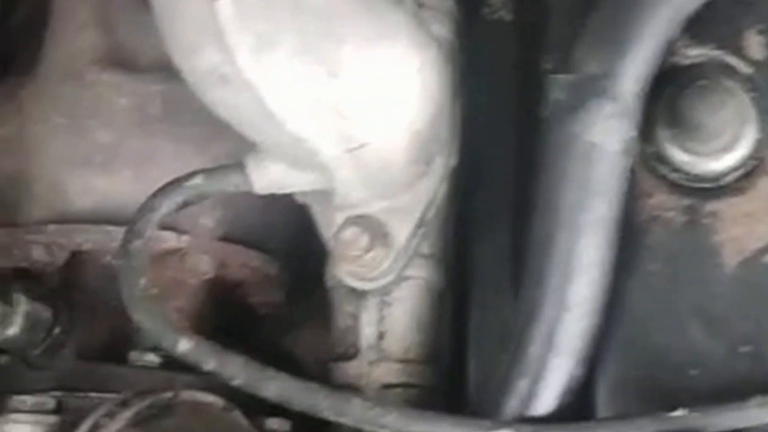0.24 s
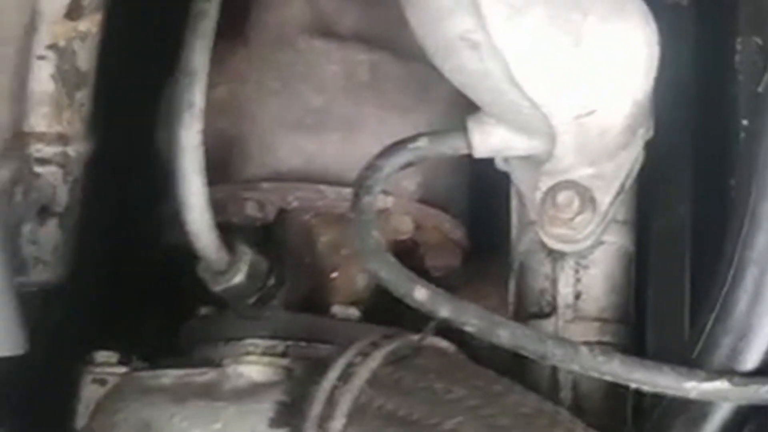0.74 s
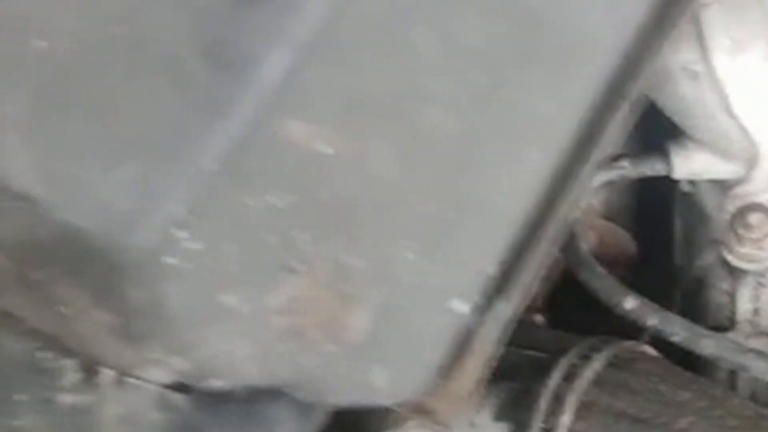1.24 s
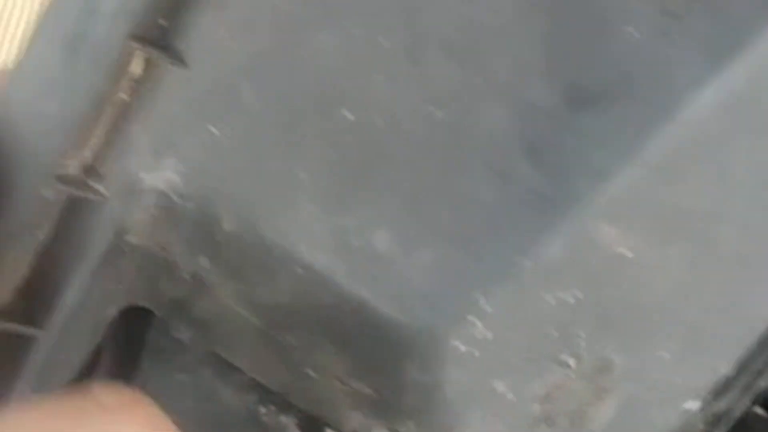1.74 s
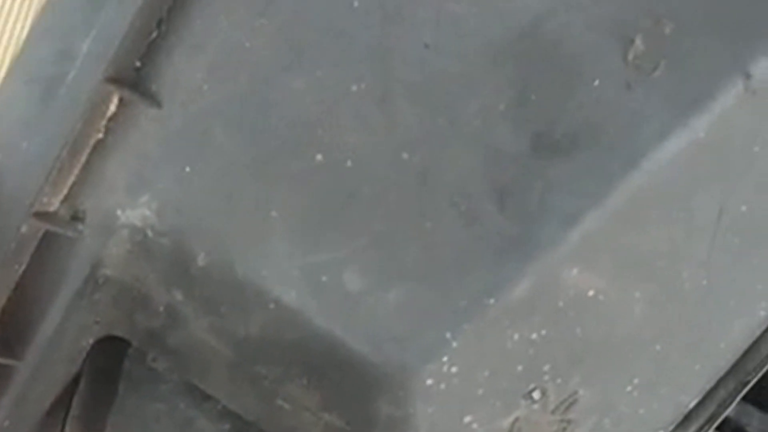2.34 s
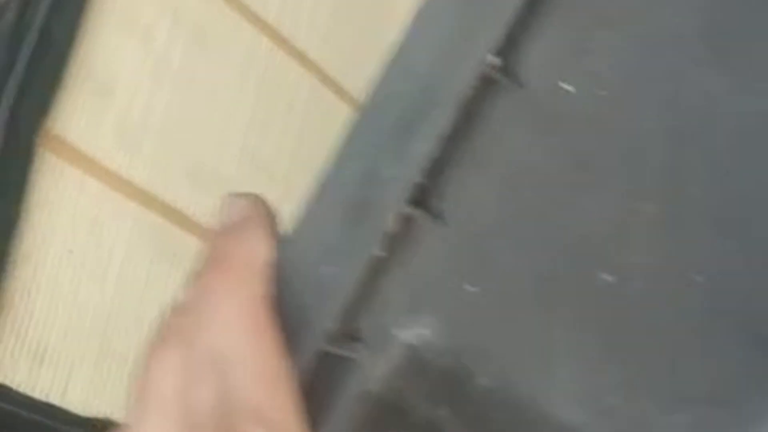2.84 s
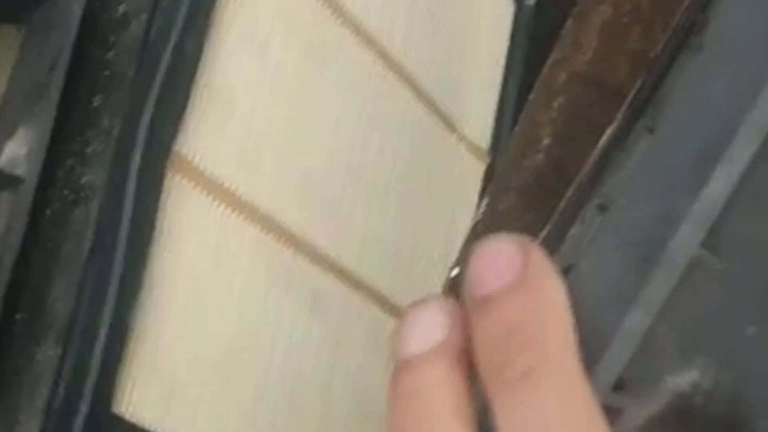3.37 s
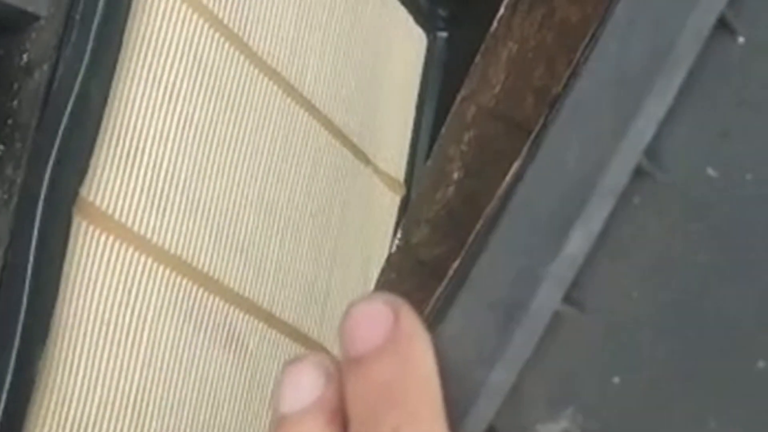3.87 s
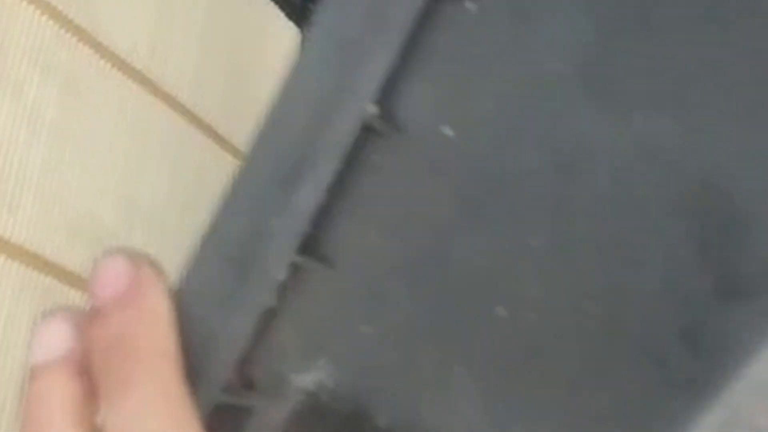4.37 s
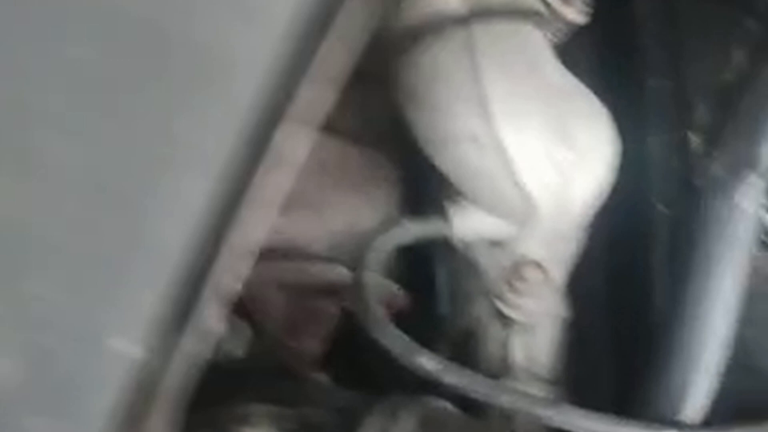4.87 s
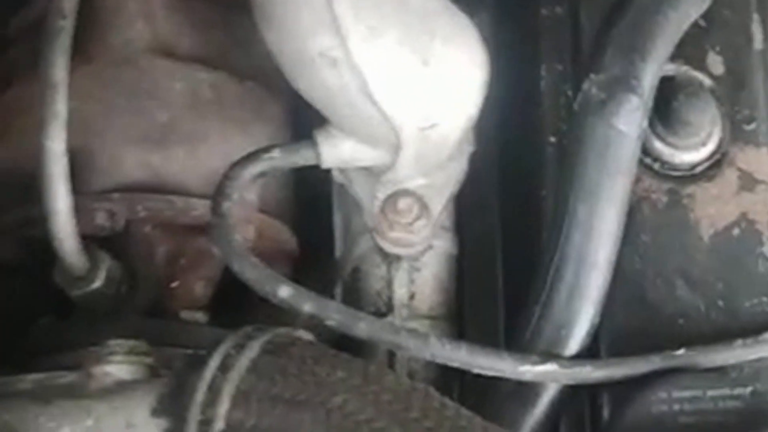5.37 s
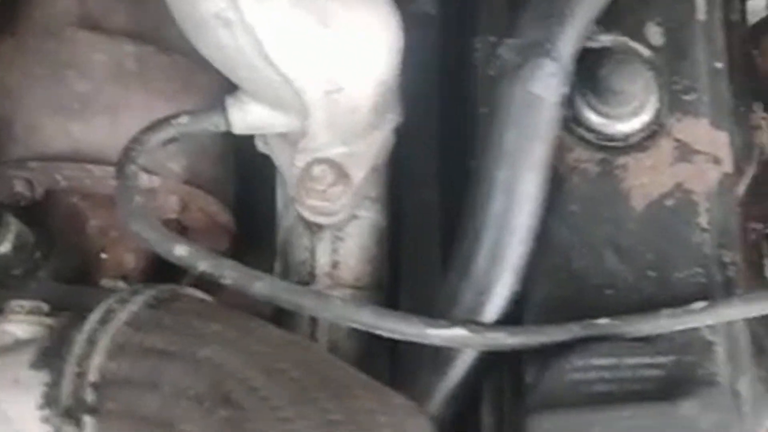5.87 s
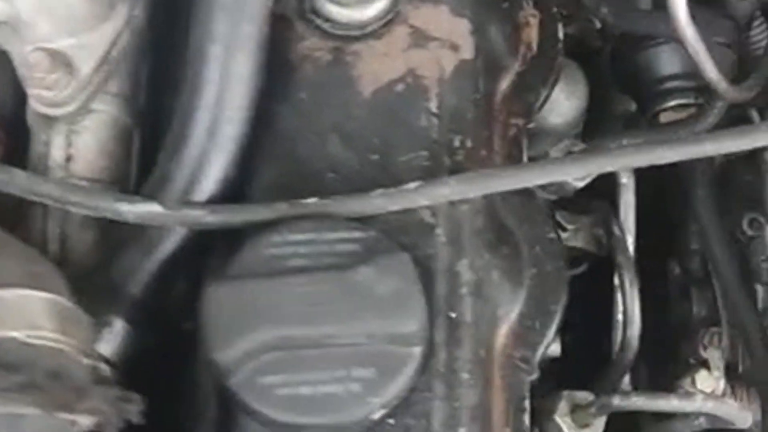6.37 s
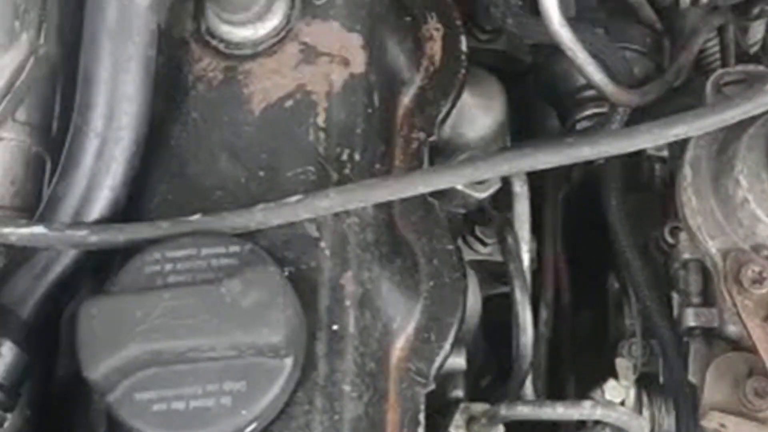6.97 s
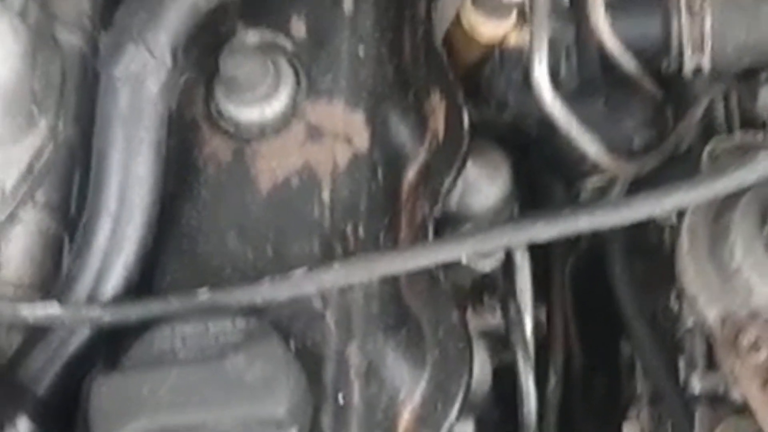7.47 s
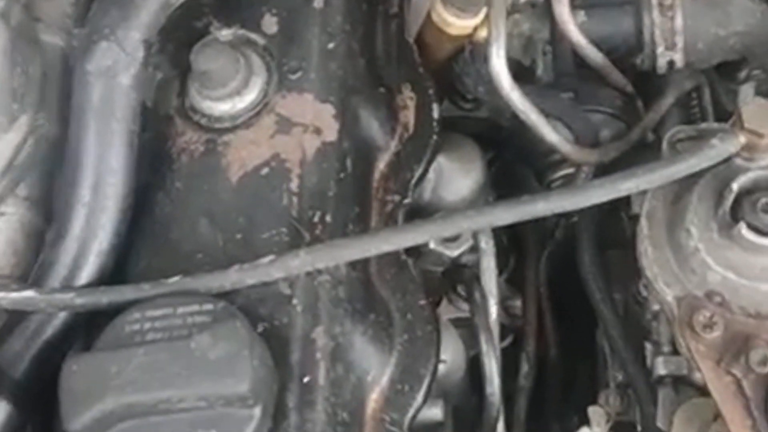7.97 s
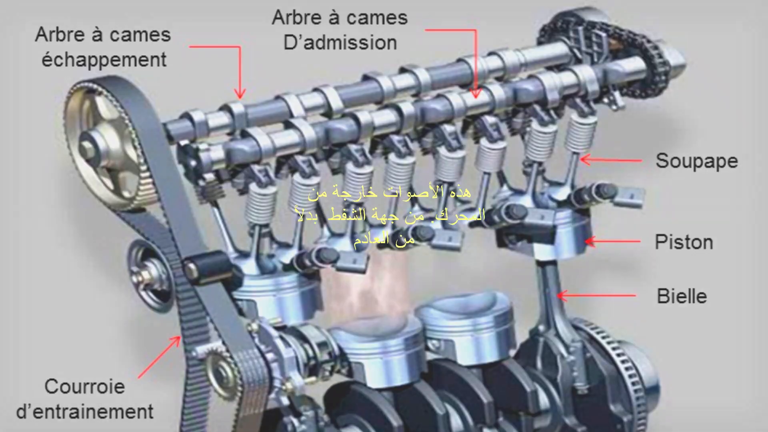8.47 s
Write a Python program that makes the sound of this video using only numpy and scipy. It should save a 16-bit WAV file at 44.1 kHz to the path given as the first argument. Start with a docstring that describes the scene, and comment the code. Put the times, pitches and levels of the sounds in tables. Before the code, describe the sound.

A four-cylinder diesel idles from 0 s, very close, at nearly 900 revolutions per minute with only a tiny drift. About thirty low intake thumps come each second; every fourth is much harder, giving a lopsided chug roughly seven times a second, with a short hollow bark falling in pitch. Over it runs dense, grainy metallic clatter in uneven bursts, ringing through the block, with bright fizz on top. The microphone leaves the valve cover around 0.7 s for the manifold, where a throbbing mid-pitched duct hum, leaning left, emerges. Around 2.9 s it reaches the open air box: clatter slightly softer and boxier, bark and hum stronger. Around 4.7 s it returns to the manifold, harder and louder clatter. From about 6 s, over the valve cover, hum fades almost away and rattle is close and crisp. At 8.2 s everything cuts abruptly to silence.

```python
"""Idling four-cylinder diesel, close up

A hand holds the air-filter lid open in the engine bay. Each cylinder gulps air with a low thump, one far
harder than the rest; the thumps ring the air box and its mouth, and one engine harmonic hums in the duct.
Bursts of shaped noise, coloured by block resonances, make the metallic clatter; slow cosines rock the engine.
The microphone moves between manifold, open air box and valve cover; the sound is cut off near the end."""
import sys
import numpy as np
from scipy import signal
from scipy.fft import rfft, irfft
from scipy.io import wavfile

SR = 44100
rng = np.random.default_rng(int(sys.argv[2]) if len(sys.argv) > 2 else 0)


def generate_wav(signal):
    """Clip the signal to [-1, 1] and save it as 16-bit WAV at the path in sys.argv[1]."""
    frames = np.transpose(np.atleast_2d(signal))
    scaled = np.clip(frames, -1, 1) * 32767
    pcm = np.round(scaled).astype(np.int16)
    wavfile.write(sys.argv[1], SR, pcm)


N = 384542
TIME = np.arange(N) / SR


def amp(db):
    """Decibels to gain."""
    return 10 ** (np.asarray(db) / 20)


def evened(x):
    """Scales to an rms of one."""
    return x / np.sqrt(np.mean(x ** 2) + 1e-20)


def read(points, hz):
    """Reads a spectrum on a log-frequency axis."""
    f, value = np.transpose(points)
    return np.interp(np.log(hz + 1), np.log(f), value)


def ports(balance_db):
    """Left and right gains for a level difference, left minus right."""
    half_db = np.atleast_1d(balance_db) / 2
    return amp(np.array([half_db, -half_db]))


def waver(rate_hz):
    """Random drift of unit rms, mostly slower than the given rate."""
    hz = np.fft.rfftfreq(N, 1 / SR)
    return evened(irfft(rfft(rng.standard_normal(N)) * np.exp(-(hz / rate_hz) ** 2), N))


PLACES, FIRST_PLACE = ("manifold", "air box", "valve cover"), "valve cover"
# Microphone moves. Each row: halfway in seconds, time taken in seconds, goal.
MOVES = [(.68, .9, "manifold"), (2.85, 1.0, "air box"), (4.7, 0.97, "manifold"),
         (6.02, 0.85, "valve cover")]
# Share of each place heard wherever the microphone is, in PLACES order, 0-1.
SPILL = (0.028, 0.036, 0.1)


def places():
    """Shares of the three listening places over time; each move is a smooth glide."""
    names = np.array(PLACES)[:, None]
    shares = (names == FIRST_PLACE) * np.ones(N)
    for halfway_s, taken_s, goal in MOVES:
        glide = .5 + .5 * np.sin(np.pi * np.clip((TIME - halfway_s) / taken_s, -.5, .5))
        shares = shares + glide * ((names == goal) - shares)
    spill = np.clip(SPILL, 0, 1)[:, None]
    return spill + max(1 - spill.sum(), 0) * shares


IDLE_RPM, FIRST_GULP_S = 887.3, .1017  # first hard gulp, before hunting shifts it
HUNT_S, HUNT_PERIOD_S, HUNT_LATE_S = 0.00082, 2.826, 1.0  # peak delay, period, time of a peak delay


def crank():
    """Engine cycles of two revolutions since the first hard gulp; the governor hunts gently."""
    behind_s = HUNT_S * np.cos(2 * np.pi * (TIME - HUNT_LATE_S) / HUNT_PERIOD_S)
    return (TIME - FIRST_GULP_S - behind_s) * IDLE_RPM / 120


def strokes(turns, place, spread_db, jitter_s, count=62):
    """One impulse each cycle at the given place, a little uneven in size and time."""
    size, slip = rng.standard_normal((count, 2)).T
    at_s = np.interp(np.arange(count) - 1 + place, turns, TIME, left=-1, right=-1)
    at = np.round((at_s + jitter_s * slip) * SR).astype(int)
    inside = (at >= 0) & (at < N)
    train = np.zeros(N)
    train[at[inside]] = amp(spread_db * size[inside])
    return train


# Rocking of the whole engine. Each row: multiple of the firing rate, rms in dB before place and side gains.
ROCKING = [(1, -32.5), (2, -54.5)]


def rocking(turns, place_db=(0, 1.2, -.8), side_db=.9):
    """The engine shakes on its mounts at multiples of the firing rate, four firings a cycle."""
    firing_rad = 8 * np.pi * turns
    shake = sum(-np.sqrt(2) * amp(db) * np.cos(round(k) * firing_rad) for k, db in ROCKING)
    return ports(side_db) * (amp(place_db) @ places()) * shake


HUM_ORDER = 46  # multiple of the cycle rate
# Duct hum before throb, waver and side gains: rms in dB at the manifold, at the air box, at the valve cover.
HUM_DB = (-37.5, -35.5, -65)


def hum(turns, side_db=7, waver_db=1.0, slip_rad=0.29, throb_db=7, low_place=.22, fall=0.15):
    """One engine harmonic sings in the duct; it builds through each cycle, collapses after the hard gulp."""
    tone = np.sqrt(2) * np.sin(2 * np.pi * HUM_ORDER * turns + slip_rad * waver(11))
    build = np.interp((turns - low_place) % 1, [0, 1 - fall, 1], [-.5, .5, -.5])
    throb = amp(throb_db * build + waver_db * waver(26))
    return ports(side_db) * (amp(HUM_DB) @ places()) * throb * tone


# Clatter bursts in each cycle. Each row: place 0-1, rise in seconds, decay constant in seconds, relative
# level on the block in dB, relative level of the treble in dB, gain at the air box and loss at the valve
# cover in dB.
KNOCKS = [(0.054, 0.0074, 0.014, -2, 0, 0), (.312, 0.0059, 0.024, -0.5, -1.95, 0),
          (0.554, 0.01, 0.068, -2, -4, 0.95), (0.747, 0.0059, 0.014, -9.5, 1.5, 2.6),
          (0.799, 0.011, 0.0052, 4.5, 1.5, 1.6)]


def blow_strength(turns, bed_db=-6.0, fizz_bed_db=-8.0, bed_shade_db=-0.5):
    """Rattle strength on the block and in the treble: a burst at each knock over a running bed."""
    t = TIME[:SR // 7]
    _, box, cover = places()
    power = (amp([[bed_db], [fizz_bed_db]]) * amp(bed_shade_db * box)) ** 2
    for place, rise_s, decay_s, block_db, treble_db, boxward_db in KNOCKS:
        shape = np.minimum(t / rise_s, 1) * np.exp(-np.maximum(t - rise_s, 0) / decay_s)
        train = strokes(turns, place, spread_db=0.8, jitter_s=0.00064)
        burst = signal.oaconvolve(train, shape)[:N]
        level = amp([[block_db], [treble_db]]) * amp(boxward_db * (box - cover))
        power = power + (level * burst) ** 2
    return np.sqrt(power / power.mean(1, keepdims=True))


def impacts(per_s=400, spread_db=2.5, decay_s=.001, share=.16, flutter_db=0.84):
    """Tiny metal contacts of random size and time, each a brief decay, make the rattle grainy."""
    sizes = amp(spread_db * np.minimum(rng.exponential(1, N), 4))
    hits = sizes * (rng.random(N) < per_s / SR)
    power = signal.lfilter([1], [1, -np.exp(-2 / (decay_s * SR))], hits ** 2)
    grain = np.sqrt(1 - share + share * power / power.mean())
    return grain * amp(flutter_db * waver(90))


def bay(hz, echo_db=-4.5, reach_s=.009, small_hz=1800, count=24):
    """Response of direct sound plus short echoes off nearby pipes and panels, too small to return bass."""
    delay, sign = rng.random((2, count)), rng.choice([-1., 1.], (2, count))
    taps = np.zeros((2, N))
    at = (SR * (.0007 + reach_s * delay)).astype(int)
    np.put_along_axis(taps, at, sign / np.sqrt(count), 1)
    echo = amp(echo_db) * hz ** 2 / (hz ** 2 + small_hz ** 2)
    return (1 + echo * rfft(taps)) / np.sqrt(1 + echo ** 2)


# Ringing of the block and its covers. Each row: frequency in Hz, width in Hz, level against the broad
# clatter in dB at the manifold, at the air box, at the valve cover.
BLOCK = [(458, 27, 3, 4.5, 3), (725, 28, 1, 3.5, 2.5), (726, 20, 13.5, -23, -29), (729, 49, -9, 8, 5.5),
         (980, 91, 0.5, 0.5, 4.5), (1051, 46, 5, 11, -6.5), (1170, 84, -16.5, 3.5, 0),
         (1836, 270, 4.5, 0, 4), (2160, 340, -14.5, 3, 5.5), (2252, 250, 9, -1.5, -2.5),
         (2763, 55, 8.5, 6, 7.5), (2915, 55, 7.5, -2, 6), (3280, 300, 3.5, 4, 5), (4650, 180, -0.5, 2, 2),
         (7800, 260, -0.5, 3, 2)]
# Broad colour of the clatter. Each row: frequency in Hz, relative spectral density in dB.
CLATTER = [(42, -4), (100, -1), (220, 1), (350, -4), (600, -2.5), (850, -3.5), (1250, -0.5), (1800, -2),
           (3000, -3.5), (4000, -0.24), (4900, -1.7), (8200, 2.5), (10000, 1.05), (12400, -10.5),
           (14200, -9)]
# Balance of the two microphone ports. Each row: frequency in Hz, left minus right in dB.
BALANCE = [(100, 0), (380, 4), (650, -0.5), (1200, 1), (3000, 1.5), (4600, 0), (6200, -3.5), (7800, -7.5),
           (9000, 0), (10200, 8.5), (12500, -1.5), (14400, 3.5)]
# Likeness of the two ports. Each row: frequency in Hz, correlation before the echoes.
LIKENESS = [(100, 0.77), (290, 0.52), (630, 0.11), (1100, 0.18), (2500, 0.062), (14000, 0.022)]
# Lid's colouring of the block at the air box. Each row: frequency in Hz, gain in dB.
SHADE = [(300, 1), (650, 4), (950, -2.5), (1500, -1), (2200, 4), (3200, 1.5), (5000, 1), (8000, 0),
         (13000, -1.5)]
# Colouring close over the valve cover. Each row: frequency in Hz, gain in dB.
CLOSE = [(300, 4.5), (600, 2), (1300, 0.5), (2500, 4), (5000, 1.14), (9000, 3), (13000, 2.5)]
# Clatter gain in dB at the manifold, at the air box, at the valve cover.
CLATTER_DB = (-17, -20.5, -18.5)
PORT_LAG_S = .00038


def clatter(turns, split_hz=5200):
    """Grainy noise bursts sound through the block's resonances, coloured by the microphone's place."""
    hz = np.fft.rfftfreq(N, 1 / SR)
    # heavy and light parts rattle on their own
    strength = blow_strength(turns) * np.array([impacts(), impacts()])
    block, treble = rfft(strength[:, None] * rng.standard_normal((2, 2, N)))
    low_share = 1 / (1 + (hz / split_hz) ** 4)
    left, other = np.sqrt(low_share) * block + np.sqrt(1 - low_share) * treble
    same = np.clip(read(LIKENESS, hz), -1, 1)
    sides = ports(read(BALANCE, hz))
    pair = np.array([left, same * left + np.sqrt(1 - same ** 2) * other])
    pair = pair * sides / np.sqrt((sides ** 2).mean(0))
    pair = pair * evened(amp(read(CLATTER, hz)))
    tilts_db = (0, read(SHADE, hz), read(CLOSE, hz))
    lags_s = (PORT_LAG_S, PORT_LAG_S, 0)
    out = np.zeros((2, N))
    for k, share in enumerate(places()):
        body = 1 + sum((amp(db[k]) - 1) / (1 + 2j * (hz - f) / width) for f, width, *db in BLOCK)
        arrival = np.exp(-2j * np.pi * np.outer([lags_s[k], 0], hz))  # left port hears it later
        out += share * irfft(pair * body * amp(tilts_db[k]) * arrival * bay(hz), N)
    return (amp(CLATTER_DB) @ places()) * out


def ring(train, modes, glide=0., settle_s=.004, swell_s=.0001):
    """Impulses set decaying modes ringing, which may start sharp and settle; levels vary by place."""
    t, shares, out = TIME[:SR // 2], places(), np.zeros((2, N))
    bent_s = t + glide * settle_s * (1 - np.exp(-t / settle_s))
    for hz, t60_s, *place_db, side_db in modes:
        envelope = (1 - np.exp(-t / swell_s)) * amp(-60 * t / t60_s)
        response = envelope * np.sin(2 * np.pi * hz * bent_s)
        out += ports(side_db) * (amp(place_db) @ shares) * signal.oaconvolve(train, response)[:N]
    return out


# One intake gulp a cylinder. Each row: place in the two-revolution cycle 0-1, relative level in dB,
# half width in seconds, lean of the pulse.
GULPS = [(0.0, -4, 0.0016, 0.029), (0.242, -15, 0.0012, 0.18), (0.473, -13.5, 0.0015, 0.11),
         (0.734, -11, 0.0016, 0.11)]
GULP_SPREAD_DB = .5
# Air-box modes. Each row: frequency in Hz, t60 in seconds, relative level in dB at the manifold, at the
# air box, at the valve cover, left minus right in dB.
AIRBOX = [(151.5, 0.16, -17, -17.5, -20.5, 0.5), (226.4, 0.14, -16.5, -19, -15, -1.5),
          (266.7, .08, -18.5, -17, -13.5, 12.5), (307, 0.062, -46.5, -47.5, -24.5, 1.5)]
# Bark of the air-box mouth after a hard gulp. Each row: settled frequency in Hz, t60 in seconds, relative
# level in dB at the manifold, at the air box, at the valve cover, left minus right in dB.
MOUTH = [(535, 0.04, -4.5, 0, -10, -4), (640, 0.14, -28.5, -32, -13, -3)]


def intake(turns, thump_db=(0, .7, -1.5), box_lag_s=0.0015, tip_db=(-26, -19, -15), tip_s=0.00054):
    """Each gulp is a pressure dip with a sharp tip, between two crests; it rings the air box and its mouth."""
    t, shares = np.arange(-SR // 80, SR // 80 + 1) / SR, places()
    thumps, blows, barks = np.zeros((3, N))
    for place, db, width_s, lean in GULPS:
        train = amp(db) * strokes(turns, place, spread_db=GULP_SPREAD_DB, jitter_s=0.000074)
        u = t / width_s
        pulse = (u ** 2 - 1 + lean * u) * np.exp(-u ** 2 / 2)
        thumps += signal.oaconvolve(train, pulse, "same")
        blows += train
        barks += train ** 2  # squared: fast flow barks far more
    box = ring(np.interp(TIME - box_lag_s, TIME, blows), AIRBOX)
    # pitch falls as the flow dies
    mouth = ring(barks, MOUTH, glide=0.32, settle_s=0.004, swell_s=0.0033)
    v = t / tip_s
    tips = signal.oaconvolve(blows, (v ** 2 - 1) * np.exp(-v ** 2 / 2), "same")
    direct = thumps * (amp(thump_db) @ shares) + tips * (amp(tip_db) @ shares)
    left, right = ports(0.76) * direct + box + mouth
    # away from the valve cover the intake lies to the right and reaches the left port later
    half_lag_s = 0.000093 * (1 - shares[2])
    return np.array([np.interp(TIME - half_lag_s, TIME, left), np.interp(TIME + half_lag_s, TIME, right)])


def scene():
    """The crank times every source."""
    turns = crank()
    return rocking(turns) + hum(turns) + clatter(turns) + intake(turns)


STOP_S, FADE_S, EDGE_HZ = 8.216, 0.0063, 14300


def record(dry):
    """The microphone passes no steady pressure; the sound is cut off with a quick fade and band-limited."""
    sound = signal.lfilter(*signal.butter(1, 2, "high", fs=SR), dry)
    cut = np.clip(sound, -1, 1) * np.clip((STOP_S - TIME) / FADE_S, 0, 1)
    low_pass = signal.firwin(801, EDGE_HZ, window=("kaiser", 8), fs=SR)
    return signal.oaconvolve(cut, low_pass[None], "same")


dry = scene()
out = record(dry)
generate_wav(out)
```